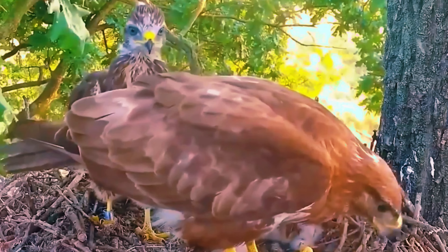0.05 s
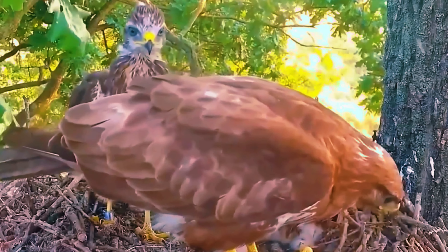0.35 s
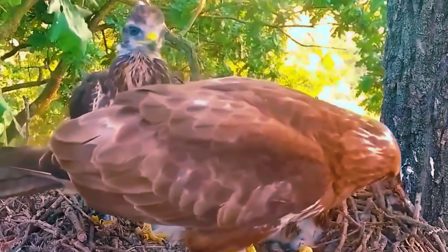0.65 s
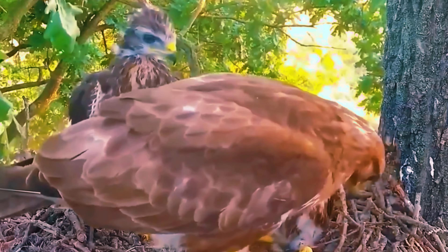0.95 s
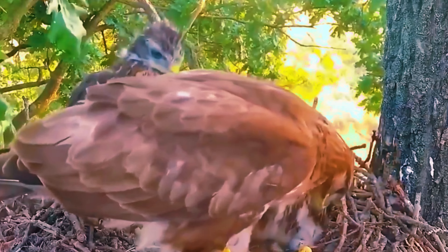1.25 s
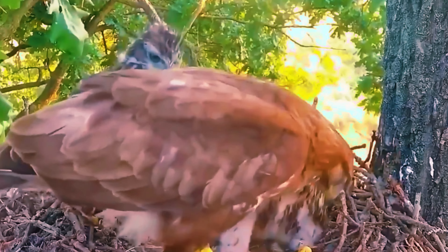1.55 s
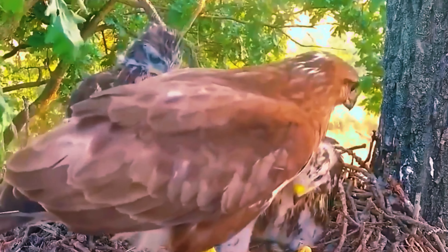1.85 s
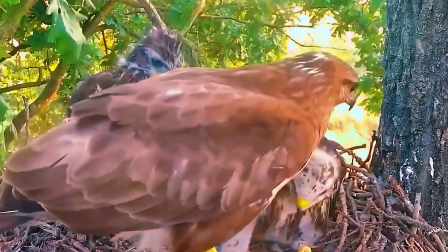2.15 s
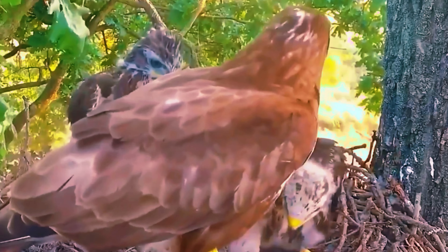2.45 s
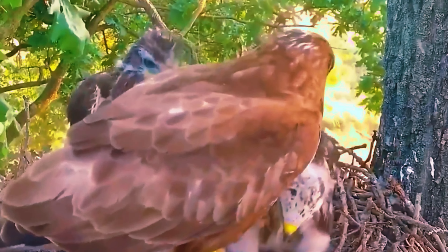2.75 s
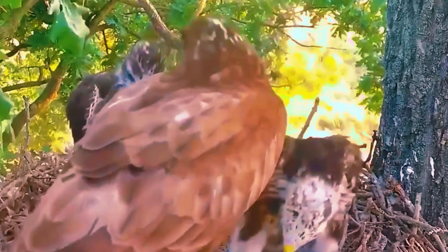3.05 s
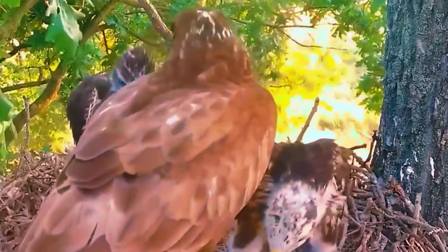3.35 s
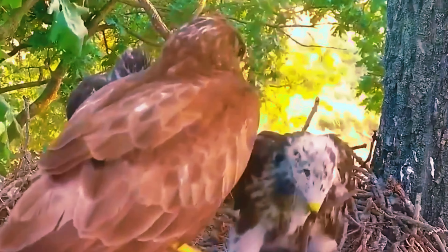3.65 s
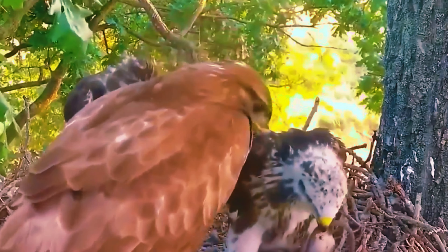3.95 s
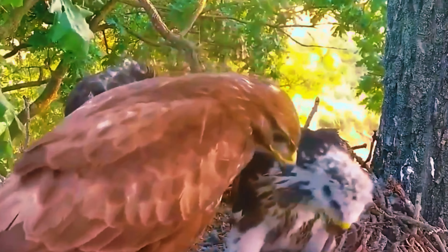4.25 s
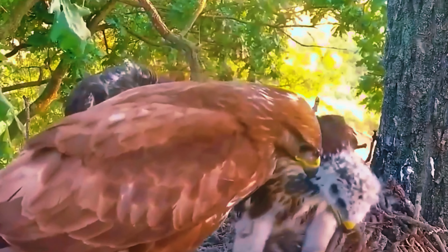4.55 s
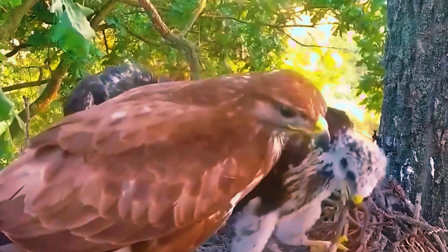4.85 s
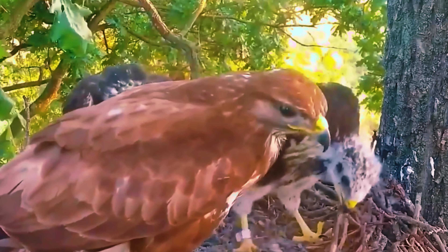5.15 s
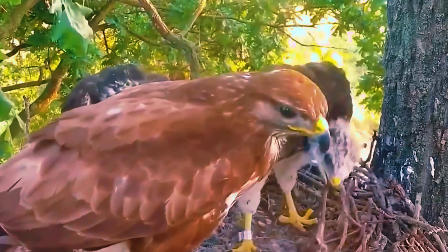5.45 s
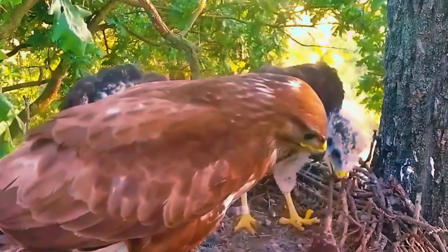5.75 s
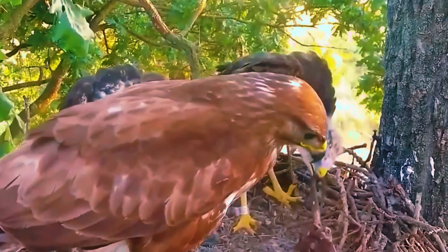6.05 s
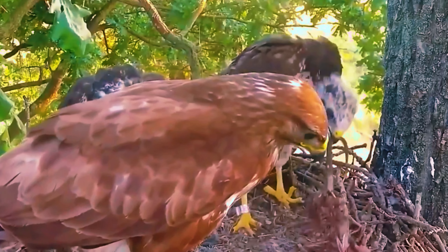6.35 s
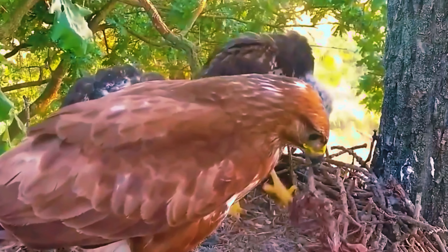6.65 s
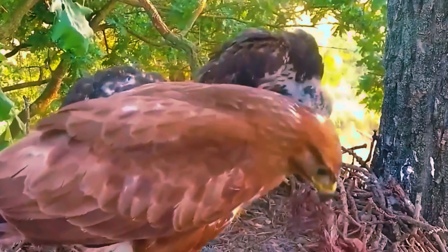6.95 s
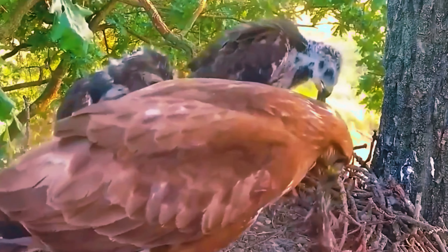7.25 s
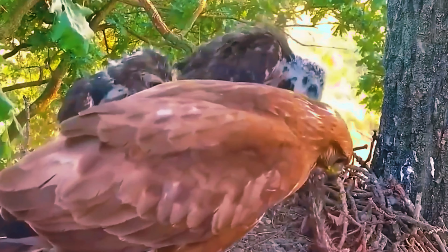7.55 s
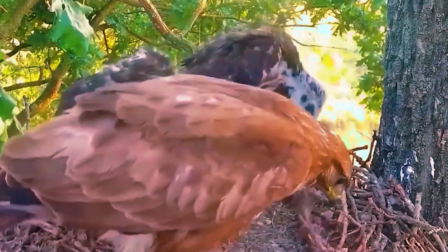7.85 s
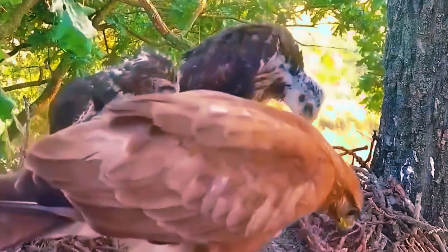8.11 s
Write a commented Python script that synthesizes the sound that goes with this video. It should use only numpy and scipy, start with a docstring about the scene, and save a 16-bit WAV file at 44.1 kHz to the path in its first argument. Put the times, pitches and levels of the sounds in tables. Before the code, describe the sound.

Buzzard chicks beg with high, breathy whistles that break into hoarse rasps, over soft thumps and shuffling in a stick nest.

```python
"""A buzzard nest in a wood, the microphone close to the sticks while the parent feeds the chicks.
Feet thump and shuffle first; then a chick begs about once a second, a breathy whistle that arches up,
falls and mostly breaks into a hoarse rasp two octaves lower. From one second in, a second chick peeps
softly and twigs tick. Past the middle, thicker sticks knock and the shuffling eases as the cries go on.
All along, a far murmur of traffic and a few faint hoots carry through the trees."""
import sys
import numpy as np
from scipy import signal
from scipy.fft import rfft, irfft, next_fast_len
from scipy.io import wavfile
from scipy.ndimage import uniform_filter1d, minimum_filter1d

SR = 44100
rng = np.random.default_rng(int(sys.argv[2]) if len(sys.argv) > 2 else 0)


def int16_out(signal):
    """Quantize to a 16-bit WAV file."""
    q = np.round(np.clip(np.atleast_2d(signal).T, -1, 1) * 32767)
    wavfile.write(sys.argv[1], SR, q.astype(np.int16))


N = 369539
TIME = np.arange(N) / SR


def chicks():
    """Two chicks close to the microphone: one whistles and rasps, the other peeps."""
    # begging whistles: (start [s], end [s], scoop [s], early pitch [Hz], late pitch [Hz], fall [s],
    # hang at the bottom [s], onset [dB], held [dB], closing [dB], squeak [dB], early breath [dB],
    # late breath [dB], sharp edge [dB], its growth [dB], roughness [0-1])
    whistles = [(0.195, 0.597, .016, 3940, 4310, 0.052, .025, -29, -53, -29, -9.5, -33.5, -32.5, -39, 20, 0.46),
                (1.087, 1.481, .014, 4094, 4430, 0.051, 0.00087, -32.5, -24, -19, -9, -40, -29.5, -32.5, 40, 0.65),
                (2.094, 2.635, 0.13, 5433, 4413, 0.046, .028, -30.5, -16.5, -15.5, -10, -32.5, -25.5, -32.5, 9.5, 0.65),
                (3.126, 3.492, .029, 4220, 4384, .075, 0.0054, -20.5, -17, -24, -16, -27.5, -27.5, -44, 10, 0.61),
                (3.488, 3.699, .005, 4030, 4590, 0.067, 0.0067, -23.5, -10.5, -21, -12, -24, -23, -28, 11, 0.43),
                (4.1, 4.586, 0.07, 5127, 4985, 0.062, 0.00067, -16, -24.5, -19.5, -12.5, -29.5, -28, -36.5, -2.5, 0.69),
                (4.943, 5.295, .025, 4060, 4840, .045, 0.0041, -17.5, -23.5, -20.5, -11, -29.5, -24.5, -37, 11.5, .55),
                (6.084, 6.45, 0.11, 4842, 5140, 0.049, 0.0017, -26, -17, -20, -13, -35, -30, -34, 6, 0.72),
                (6.911, 7.35, 0.01, 4140, 5035, 0.077, 0, -15.5, -26.5, -28, -22, -35, -32.5, -37.5, 4.5, .55),
                (7.893, 8.224, .025, 4135, 4264, 0.084, 0.016, -22, -28, -31.5, -20, -48, -35.5, -43.5, 23, 0.87)]
    # rasps that end the cries: (start [s], end [s], second partial [Hz], its sag [Hz/s], its level [dB],
    # fundamental [dB], upper partials [dB], fade of all but the second [dB/s], roughness [0-1])
    rasps = [(0.597, 0.744, 2352, 1746, -23, -26, -23.5, 124, 0.37),
             (1.474, 1.633, 2380, 100, -15.5, -22, -19, 18.5, 0.38),
             (2.627, 2.777, 2342, 98.6, -17.5, -25, -16.5, 17, 0.79),
             (4.564, 4.738, 2377, 737, -14.5, -21, -15.5, 8.5, 0.55),
             (5.279, 5.535, 2253, 196, -13, -24, -17, 6, 0.78),
             (6.428, 6.61, 2322, 400, -12.5, -33, -20.5, -6, 0.7),
             (7.33, 7.515, 2400, 100, -21, -24.5, -23.5, 3, 1),
             (8.226, 8.261, 2128, 100, -24, -21, -18.5, 5, 0.6)]
    # peeps: (start [s], end [s], early pitch [Hz], late pitch [Hz], first level [dB], last level [dB])
    peeps = [(0.98, 1.105, 3720, 3920, -32, -34), (1.952, 2.1, 4290, 4050, -26, -66),
             (2.848, 3.25, 4190, 4575, -34.5, -27), (3.857, 4.099, 4090, 4330, -33, -33.5),
             (5.837, 5.979, 4370, 4530, -56.5, -47.5), (7.148, 7.241, 4040, 3470, -38, -35),
             (7.595, 7.81, 4300, 4390, -59, -56.5), (8.256, 8.349, 4310, 4200, -40.5, -27)]
    out = np.zeros(N)
    for voice, calls in ((whistle, whistles), (rasp, rasps), (peep, peeps)):
        for row in calls:
            add(out, *voice(row))
    return out


def whistle(row, jitter=.025, wobble=.012, drift=.008, flutter_hz=1220, throb_db=2, swell_db=5.5):
    """A strained near-sine; the slack low voice flutters against it, throwing side tones up and down."""
    # what the throat passes of the side tones and overtones: (frequency [Hz], gain [dB])
    throat = [(1500, -36.5), (2400, -4), (3000, -4), (3700, 2.5), (5600, 0), (6600, -5), (8400, -18),
              (9000, -18.5), (13000, -40)]
    # breath in the open beak: (frequency [Hz], level [dB])
    hiss = [(200, -18), (700, -21.5), (1200, -17), (1900, -22), (2400, -9.5), (2900, -1), (3600, 4.5),
            (4500, -0.5), (5800, 1.5), (6600, -26.5), (8000, -34), (12000, -46.5)]
    # the sharp edge of that breath: (frequency [Hz], level [dB])
    edge = [(4500, -19.5), (6400, 6.5), (7300, 3), (8400, -4), (9500, -25.5), (11000, -20), (12800, -34),
            (14000, -49.5)]
    t, gate, hz, db, air_db, sharp_db, rough = arch(row)
    n = len(t)
    unsteady = jitter * waver(490, n) + wobble * waver(45, n) + drift * waver(12, n)
    phase = cycle(hz * (1 + rough * unsteady))
    tone = smeared(phase, .55 * rough, 110) * undb(db + .57 + throb_db * waver(42, n))
    flutter_wander = .1726 * waver(450, n) + .1 * waver(30, n)
    flutter = cycle(flutter_hz * (1 + np.sqrt(rough) * flutter_wander))
    sides = undb(-4) * unit(np.sin(flutter) * np.sin(phase)) + undb(-14) * np.sin(phase + 2 * flutter)
    # as the pitch collapses, every other cycle weakens and a tone appears a fifth above
    falling = uniform_filter1d(np.clip(-np.gradient(np.log(hz)) * SR / 2, 0, 1), size=512)
    fifth = undb(-7) * falling * np.sin(1.5 * phase)
    octave = undb(db + glide(-26, -16, falling)) * smeared(2 * phase, rough, 160)
    overtones = colour((sides + fifth) * undb(air_db) + octave, throat)
    low_voice = np.sin(flutter) * undb(air_db - 20)
    air = noise(hiss, n) * undb(air_db - 5)
    air += noise(edge, n) * undb(sharp_db - 2 + 2 * waver(70, n) + swell_db * waver(4.8, n))
    return t[0], gate * (tone + overtones + low_voice + air)


def arch(row, onset_hz=3180, break_hz=3073, attack_s=.019, attack_db=12, release_db=9):
    """Pitch and levels of one whistle: it scoops up, is held, then falls with a last squeak."""
    # catches where the voice jumps, sags, frays or clears: (middle [s], length [s], pitch shift [Hz],
    # level change [dB], sharp edge change [dB], roughness change [-])
    catches = [(.43, 0.15, -91.5, 14, 3, -0.018), (1.22, 0.13, -0.5, -2.5, -10, -0.22),
               (2.558, 0.045, -170, -3, 3.5, -0.22), (2.598, .02, 420, 0, 0, 0),
               (3.33, 0.076, 30, -0.5, 4.5, 0.14), (4.244, 0.093, -230, 0.5, -2, 0.0063),
               (4.381, 0.054, 124, -2, 0.5, .1), (4.451, .05, -110, 2.5, -4, 0.022),
               (5.054, .03, 134.5, -1, 2, 0.25), (5.108, 0.043, -170, 0.5, -1, .3),
               (5.197, 0.073, 92.5, 3.5, 1, -0.36), (6.12, 0.08, -200, 3, -3.5, -0.033),
               (6.215, 0.039, 280.5, -2, 3.5, 0.28), (6.283, 0.064, -140, -2, -0.5, 0.044),
               (6.38, 0.047, -110, 2.5, 1.5, -0.36), (7.061, 0.083, -70, 4.5, 1, -0.42),
               (7.123, .06, -80.5, -2, 9.5, 0.35), (7.2, .1, 110, 0, -3.5, -0.42)]
    (start, end, scoop_s, early_hz, late_hz, fall_s, hang_s, onset_db, held_db, closing_db, squeak_db,
     early_air_db, late_air_db, edge_db, growth_db, rough) = row
    t, progress, gate = span(start, end, .006)
    opened, fallen = start + attack_s, end - hang_s
    closing, squeak = fallen - .8 * fall_s, fallen - .42 * fall_s  # the last push begins, then peaks
    fall = np.clip(1 - (fallen - t) / fall_s, 0, 1) ** 1.85
    risen_hz = scoop(onset_hz, glide(early_hz, late_hz, progress), t - start, scoop_s)
    hz = glide(risen_hz, break_hz, fall)
    slack_db = 47.5 * (1 - risen_hz / risen_hz.max())  # the edge is duller below the top pitch
    taper_db = np.interp(t, [start, opened], [attack_db, 0])
    taper_db += np.interp(t, [squeak, fallen], [0, release_db])
    stages = [opened, (opened + closing) / 2, closing, squeak]
    db = np.interp(t, stages, [onset_db, held_db, closing_db, squeak_db]) - taper_db
    for s, length, shift_hz, change_db, sharpen_db, fray in catches:
        catch = bump(t, s, length)
        hz, db = hz + shift_hz * catch, db + change_db * catch
        edge_db, rough = edge_db + sharpen_db * catch, rough + fray * catch
    air_db = glide(early_air_db, late_air_db, progress) - taper_db / 2
    sharp_db = edge_db - growth_db * (1 - progress) - slack_db - taper_db
    return t, gate, hz, db, air_db, sharp_db, np.clip(rough, 0, 1)


def rasp(row, jitter=.027, wobble=.0183, shimmer_db=1.74,
         give_out_s=.043, give_out_hz=368, give_out_db=14.5):
    """The voice drops to its low register: uneven cycles, a steadier second partial, rushing air."""
    # upper partials: (multiple of the fundamental [-], relative level [dB])
    upper_partials = [(3, -1.5), (4, -10), (5, -23)]
    # hoarse air in the open beak: (frequency [Hz], level [dB])
    hoarse = [(150, -44), (380, -7), (650, -23.5), (1000, 2), (1350, 10.5), (1800, -3.5), (2600, 6),
              (3000, 0.5), (3600, 7.5), (4600, -6.5), (5500, -11), (8300, -24.5), (9500, -46.5),
              (13000, -46)]
    start, end, hz, sag_hz_per_s, second_db, first_db, upper_db, fade_db_per_s, rough = row
    t, _, gate = span(start, end, .008)
    n, age = len(t), t - start
    spent = np.clip(1 - (end - t) / give_out_s, 0, 1) ** 2  # pitch and level drop as the breath runs out
    second_hz = hz - sag_hz_per_s * age - give_out_hz * spent
    first_db, upper_db = first_db - fade_db_per_s * age, upper_db - fade_db_per_s * age
    unsteady = jitter * waver(200, n) + wobble * waver(24, n)
    phase = cycle(second_hz / 2 * (1 + rough * unsteady))
    partials = [(1, first_db, .72), (2, second_db, .55)]
    partials += [(k, upper_db + db, 2.1) for k, db in upper_partials]
    voice = sum(undb(db - 2) * smeared(k * phase, scatter * rough, 160) for k, db, scatter in partials)
    air = np.sqrt(rough) * undb(upper_db - 4) * noise(hoarse, n)
    return t[0], gate * (voice + air) * undb(shimmer_db * rough * waver(60, n) - give_out_db * spent)


def peep(row, onset_hz=3340, scoop_s=.026, jitter=.0075):
    """The second chick's thin, slightly shaky note scoops up and glides on."""
    start, end, early_hz, late_hz, first_db, last_db = row
    t, progress, gate = span(start, end, .02)
    hz = scoop(onset_hz, glide(early_hz, late_hz, progress), t - start, scoop_s)
    phase = cycle(hz * (1 + jitter * waver(300, len(t))))
    tone = smeared(phase, scatter=.39, width_hz=50)
    return t[0], gate * tone * undb(glide(first_db, last_db, progress) - 5)


def nest(light_db=-52, thump_s=.0061):
    """The springy heap of sticks rumbles under shifting feet; each firm step is a heavily damped thud."""
    # the birds shifting their weight: (middle [s], length [s], level [dB])
    shifts = [(0.154, 0.1, -32), (.54, 0.24, -41), (0.77, 0.14, -39), (1.05, 0.15, -24.5), (1.3, .14, -30),
              (1.587, 0.23, -36.5), (1.98, 0.19, -41.5), (3.66, 0.051, -59), (4.015, .26, -39.5),
              (4.413, 0.085, -45.5), (5.076, 0.15, -43.5), (7.514, 0.073, -36.5), (7.804, 0.068, -44)]
    # their restlessness in between: (time [s], level [dB])
    stirring = [(0, -41), (1.7, -44.5), (2.2, -50), (2.6, -49), (2.9, -60.5), (3.3, -55.5), (4.3, -53),
                (4.7, -61), (5.2, -53), (5.6, -64.5), (6.6, -65), (7.3, -63), (8.38, -55.5)]
    # rumble of the heap: (frequency [Hz], level [dB])
    heap = [(12, -30.5), (20, 1.5), (53, 2.5), (141, -4.5), (201, -13), (365, -36.5), (433, -31.5),
            (600, -40), (780, -80), (1320, -120)]
    # footfalls and tugs at the prey: (time [s], level [dB], pitch [Hz])
    thumps = [(0.136, -24.5, 47), (0.55, -27, 54.8), (0.83, -23.5, 35.0), (1.008, -37, 32.6),
              (1.067, -36, 90.5), (1.098, -33, 32.3), (1.293, -22.5, 66.7), (1.324, -25, 57.3),
              (1.8, -26, 32.7), (3.963, -31.5, 71.2)]
    shifting = sum(undb(db) * bump(TIME, s, length) for s, length, db in shifts)
    movement = np.hypot(shifting, envelope(stirring))
    rumble = noise(list(heap) + [(2000, -92)])
    # light movements stir only the top sticks, heavy ones sway the whole heap
    top_sticks = unit(colour(rumble, [(30, -13), (130, -3.5), (400, 9)]))
    heavy = movement / (movement + undb(light_db))
    out = glide(top_sticks, rumble, heavy) * movement * undb(-1)
    t = TIME[:SR // 5]
    thud = t / thump_s * np.exp(1 - t / thump_s)
    for s, db, hz in thumps:
        add(out, s, undb(db - 2) * thud * np.sin(2 * np.pi * hz * t))
    return out


def twigs(tick_s=.014, rustle_db=-18, rustle_s=.048, knock_s=.059, gain_db=-8):
    """Thin twigs tick and set their neighbours rustling; thicker sticks give a dull knock."""
    # twig and beak ticks: (time [s], level [dB], centre [Hz])
    ticks = [(1.048, -34.5, 1700), (3.0674, -38, 1260), (3.0815, -27.5, 1960), (3.8, -34.5, 3100),
             (5.7216, -35, 1980), (5.8094, -53, 1480), (5.9423, -32.5, 2690), (6.7275, -35.5, 1640),
             (7.7947, -46, 1790), (7.8874, -29, 3420)]
    # sticks knocking under a chick's feet: (time [s], level [dB], centre [Hz])
    knocks = [(3.53, -41, 436), (5.14, -34.5, 535), (5.18, -37, 565), (5.478, -32.5, 353),
              (5.555, -38, 413), (5.629, -48, 450), (5.72, -33.5, 420)]
    out, t = np.zeros(N), TIME[:SR // 3]
    tick_decay = np.exp(-t / tick_s) + undb(rustle_db) * np.exp(-t / rustle_s)
    for s, db, hz in ticks:
        wood = noise([(300, -14), (hz / 2, -8), (hz, 0), (2 * hz, -14), (12000, -45)], len(t))
        add(out, s, undb(db) * wood * tick_decay)
    for s, db, hz in knocks:
        wood = noise([(hz / 2, -20), (hz, 0), (2 * hz, -18), (8000, -50)], len(t))
        add(out, s, undb(db) * wood * np.exp(-t / knock_s))
    return out * undb(gain_db)


def wood_echo(x, near_db=-12, near_t60=.05, far_db=-33, far_t60=.4):
    """Nest and trunk scatter the sound at once; the trees farther off return a faint longer tail."""
    t, response = TIME[:SR], np.zeros(SR)
    for db, t60, first_s in ((near_db, near_t60, .002), (far_db, far_t60, .015)):
        scattered = noise([(300, 3), (2500, 3), (5000, 4.5), (12000, -17)], len(t))
        tail = scattered * undb(-60 * t / t60) * (t > first_s)
        response += undb(db) * tail / np.linalg.norm(tail)
    return x + signal.fftconvolve(x, response)[:N]


def far_traffic(patchy_db=3, band_spread=.094):
    """Tyre noise from far off through the wood swells and fades band by band."""
    # swell of the traffic: (time [s], level [dB])
    swell = [(0.0, -48), (1.4, -54), (2.4, -40), (3.01, -51.5), (3.85, -42.5), (4.2, -59.5), (4.95, -52),
             (5.25, -46), (5.93, -46.5), (6.46, -41), (6.86, -52), (7.21, -43.5), (8.03, -51), (8.38, -37)]
    # bands of tyre noise: (centre [Hz], level [dB])
    bands = [(760, -3), (840, -6.5), (930, 0.5), (1040, -4.5)]
    tyres = np.zeros(N)
    for hz, db in bands:
        gain = undb(db + patchy_db * waver(2.1))
        tyres += gain * waver(band_spread * hz) * np.sin(2 * np.pi * hz * TIME)
    return unit(tyres) * envelope(swell) * undb(1)


def far_hoots(jitter=.031):
    """Faint hoots in the distance, each a short tone blurred by its wavering pitch."""
    # hoots: (time [s], length [s], pitch [Hz], level [dB])
    hoots = [(0.69, 0.19, 752, -44), (2.27, 0.27, 769, -46.5), (2.768, 0.094, 750, -46),
             (3.36, 0.16, 771, -40), (6.584, .13, 743, -41.5), (7.022, 0.11, 762, -43),
             (7.686, 0.23, 744, -45.5), (8.287, 0.15, 775, -47)]
    out = np.zeros(N)
    for s, length, hz, db in hoots:
        n = int(length * SR)
        phase = cycle(hz * (1 + jitter * waver(110, n)))
        add(out, s, undb(db) * unit(np.hanning(n) * np.sin(phase)))
    return out


def still_air(level_db=-53):
    """The air of the wood hisses faintly all around the microphone."""
    # still air: (frequency [Hz], level [dB])
    air = [(25, -6.5), (100, -18.5), (250, 5), (600, -1), (1300, -1), (2200, 0), (3500, -3), (4400, -3),
           (5200, -11), (8000, -13.5), (12800, -19.5), (14000, -51)]
    return noise(air) * undb(level_db)


def undb(db):
    """Decibels to gain."""
    return 10 ** (np.asarray(db) / 20)


def unit(x):
    """Scale to rms 1."""
    return x / np.sqrt(np.mean(x ** 2))


def colour(x, points):
    """Filter a sound by a curve of (frequency [Hz], gain [dB]) points."""
    hz, db = np.transpose(points)
    n = next_fast_len(len(x))
    f = np.maximum(np.fft.rfftfreq(n, 1 / SR), 1)
    gain = undb(np.interp(np.log(f), np.log(hz), db))
    return irfft(rfft(x, n) * gain, n)[:len(x)]


def noise(points, size=N):
    """Coloured noise of rms 1."""
    return unit(colour(rng.standard_normal(size), points))


def waver(rate_hz, size=N):
    """Random motion of rms 1, mostly slower than the given rate."""
    sos = signal.butter(2, rate_hz, fs=SR, output="sos")
    return unit(signal.sosfilt(sos, rng.standard_normal(size)))


def smeared(phase, scatter, width_hz):
    """A partial of rms near 1 that chaotic vibration spreads into a narrow, beating band."""
    chaos = 1 + scatter * (waver(width_hz, len(phase)) + 1j * waver(width_hz, len(phase)))
    return np.real(chaos * np.exp(1j * phase)) / np.sqrt(.5 + scatter ** 2)


def cycle(hz):
    """Phase of an oscillator that follows a pitch curve."""
    return 2 * np.pi * np.cumsum(hz) / SR


def glide(first, last, progress):
    """A straight line from one value to another."""
    return first + (last - first) * progress


def scoop(onset_hz, held_hz, age_s, scoop_s):
    """Pitch slides up from the onset to the held note as the voice tenses."""
    return glide(held_hz, onset_hz, np.exp(-np.maximum(age_s, 0) / scoop_s))


def bump(t, middle_s, length_s):
    """A smooth swell from 0 to 1 and back."""
    return np.exp(-(2 * (t - middle_s) / length_s) ** 2)


def envelope(points):
    """Gain that follows (time [s], level [dB]) points."""
    return undb(np.interp(TIME, *np.transpose(points)))


def span(start_s, end_s, fade_s):
    """Sample times of one call, its progress from 0 to 1 and a gate with soft edges."""
    start, end = start_s - fade_s / 2, end_s + fade_s / 2
    t = TIME[(TIME >= start) & (TIME < end)]
    gate = np.clip(np.minimum(t - start, end - t) / fade_s, 0, 1)
    return t, np.linspace(0, 1, len(t)), gate


def add(out, start_s, sound):
    """Mix a sound in at its time."""
    i = max(int(start_s * SR), 0)
    out[i:i + len(sound)] += sound[:max(N - i, 0)]


def scene():
    """One microphone at the nest: chicks, twigs and rumble close by, traffic and hoots far behind."""
    close = wood_echo(chicks() + twigs()) + nest()
    return (close + far_traffic() + far_hoots() + still_air())[None]


def record(dry, ceiling=.94, top_hz=14500):
    """A limiter eases the loudest peaks under full scale; the top treble is cut."""
    gain = ceiling / np.maximum(np.abs(dry), ceiling)
    gain = uniform_filter1d(minimum_filter1d(gain, size=256), size=256)
    lowpass = signal.ellip(8, .2, 80, top_hz, fs=SR, output="sos")
    return signal.sosfilt(lowpass, dry * gain)


dry = scene()
out = record(dry)
int16_out(out)
```